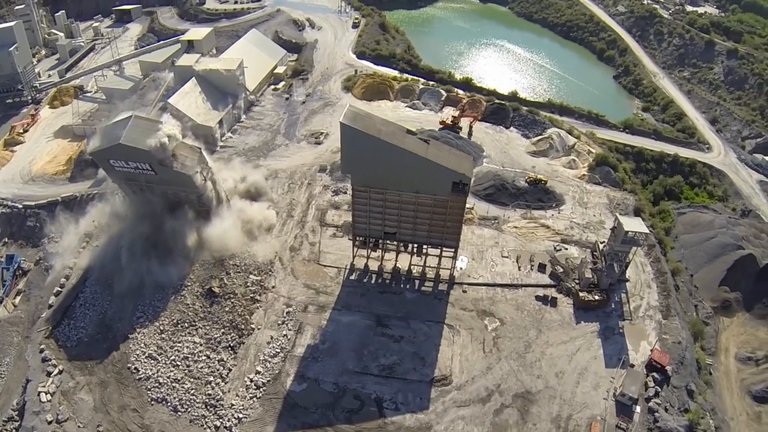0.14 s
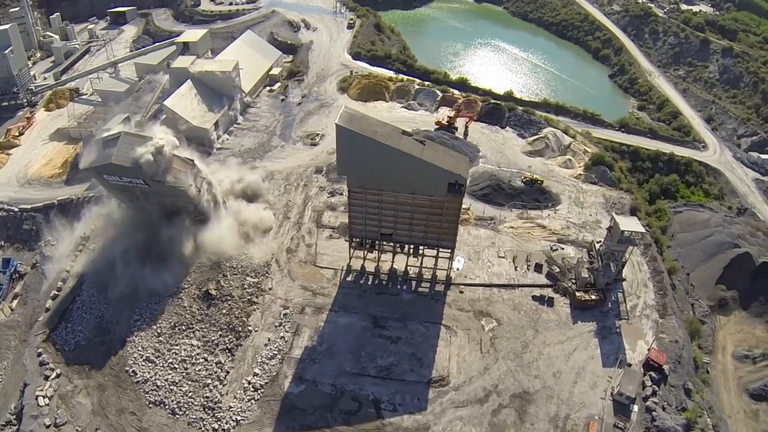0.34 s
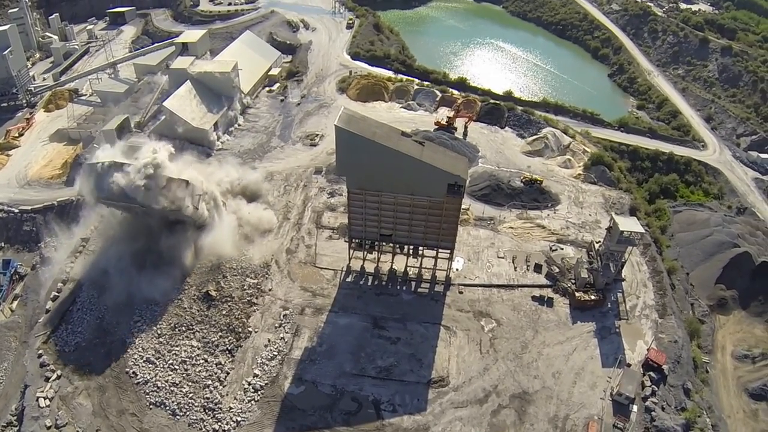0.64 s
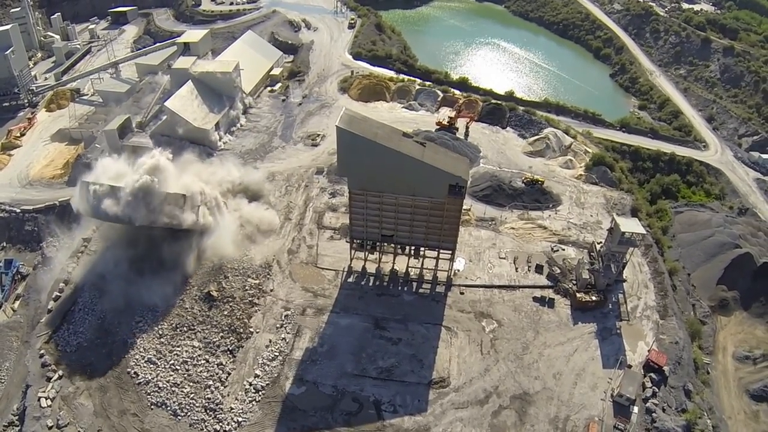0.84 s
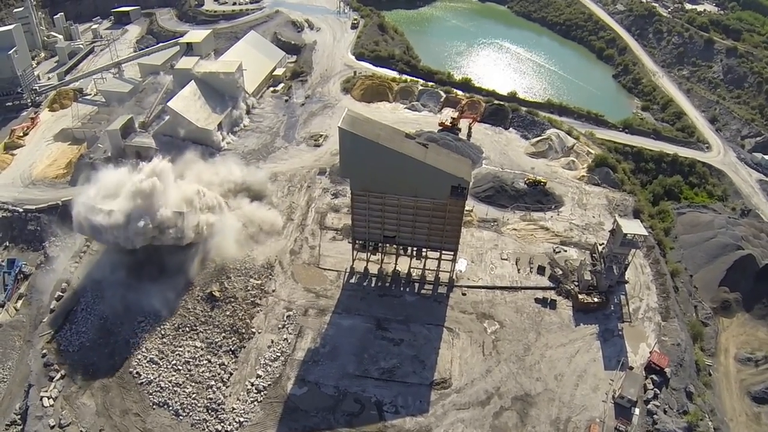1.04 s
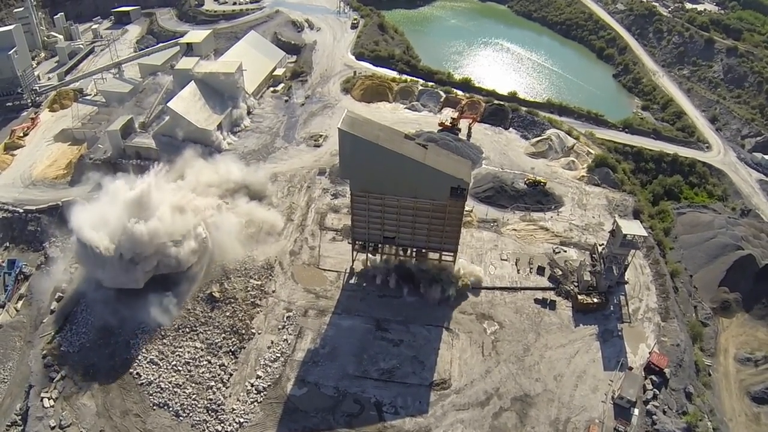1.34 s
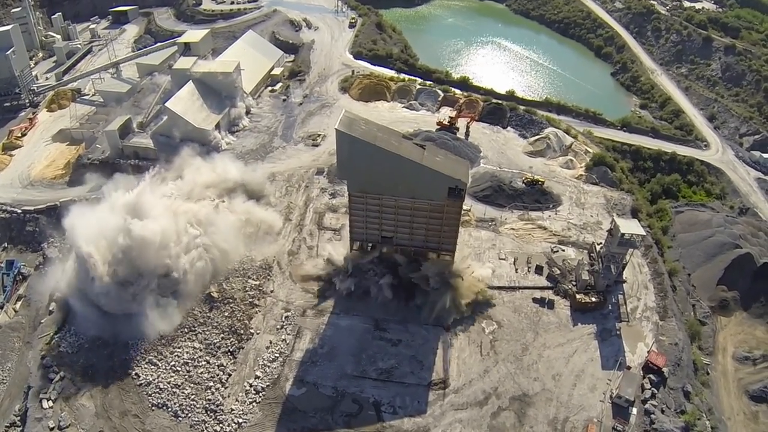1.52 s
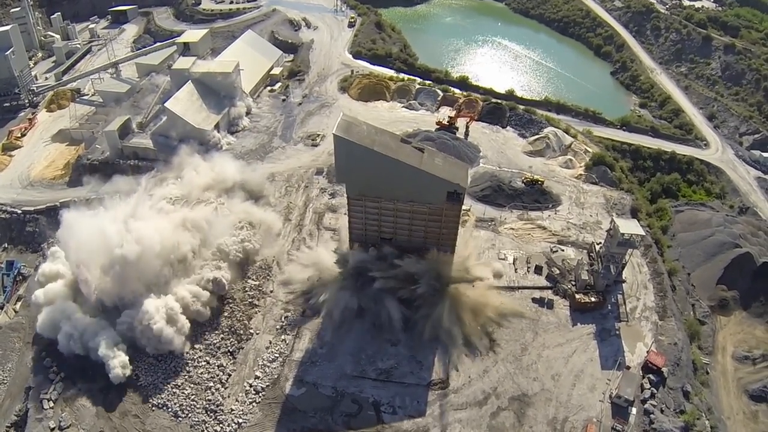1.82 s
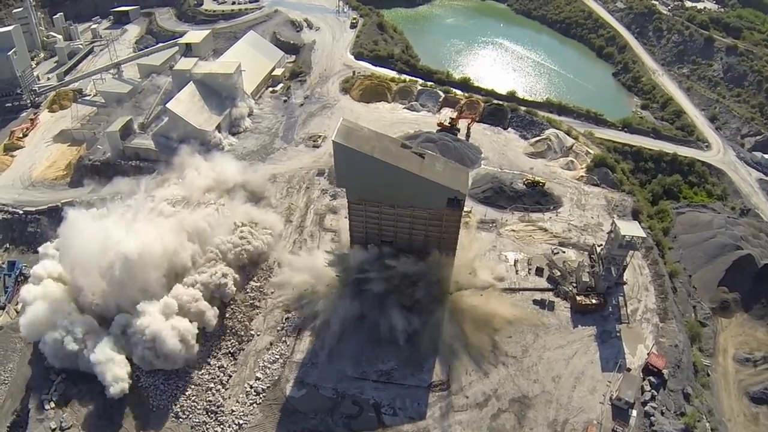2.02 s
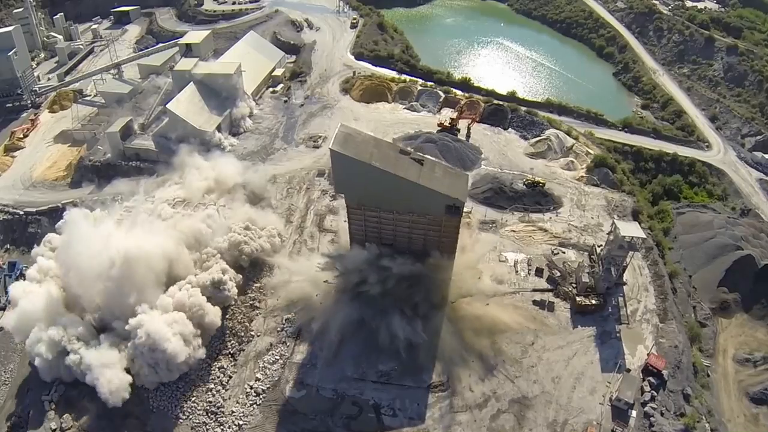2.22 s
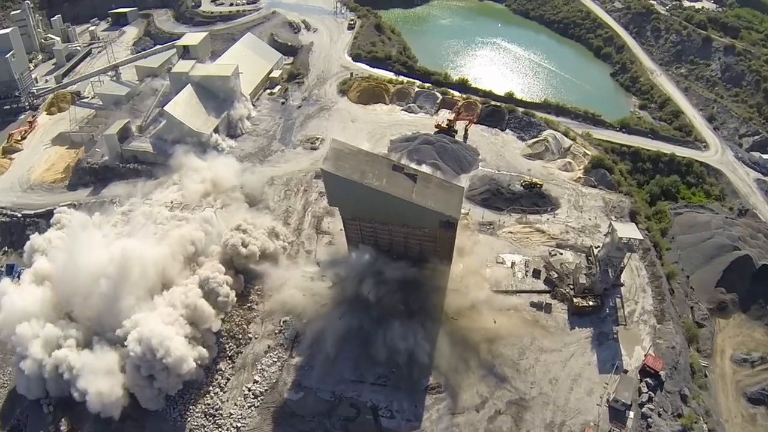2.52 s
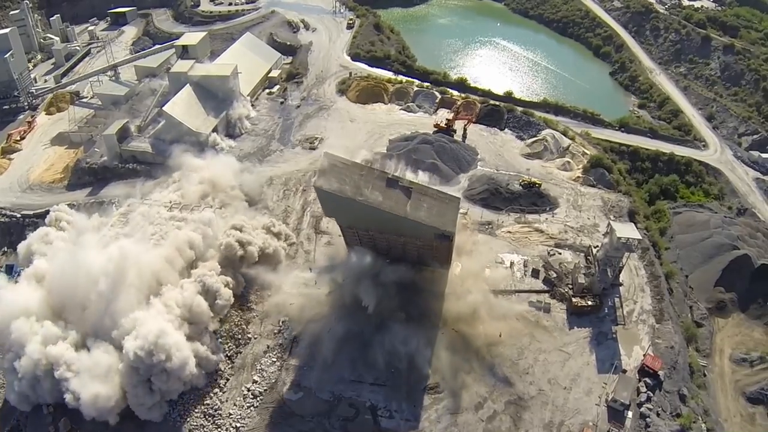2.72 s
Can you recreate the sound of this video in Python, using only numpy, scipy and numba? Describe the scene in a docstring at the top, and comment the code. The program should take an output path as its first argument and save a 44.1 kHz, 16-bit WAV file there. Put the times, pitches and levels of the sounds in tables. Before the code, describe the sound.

Explosive charge bangs at a tower base, overloading a wind-battered aerial microphone, then a low collapsing roar

```python
"""Wind and rotor downwash buffet a camera microphone hung under a rotor aircraft over a quarry.
Motors hiss and whine close by; gusts, eddies and ticks strike the microphone; falling buildings roar below.
At 1.52 s a demolition charge fires at the base of a tower: shock front, overpressure, crackle and low roll.
Sources are shaped noise, sines and pressure pulses. The blast pins the capsule against its stop;
the camera's gain control ducks at every overload and creeps back."""
import sys
import numpy as np
from scipy import signal
from scipy.fft import rfft, irfft, next_fast_len
from scipy.io import wavfile
from scipy.ndimage import minimum_filter1d, map_coordinates
from numba import njit

SR = 44100
rng = np.random.default_rng(int(sys.argv[2]) if len(sys.argv) > 2 else 0)


def waveform_to_disk(signal):
    """Save audio, clipped to [-1, 1], as 16-bit WAV at the path in sys.argv[1]."""
    frames = np.transpose(np.atleast_2d(signal))
    scaled = np.clip(frames, -1, 1) * 32767
    samples = np.round(scaled).astype(np.int16)
    wavfile.write(sys.argv[1], SR, samples)


N = 126126

# Every spectrum below lists freq_hz, density_db (per Hz, relative: the noise is scaled to rms 1).

# Low roll of the charge: time_s, level_db
ROLL_LEVEL = [(1.52, 1), (1.57, 12.5), (1.65, 11), (1.72, 9), (1.78, 5), (1.84, 2), (1.88, 1)]
# Tone of that roll: freq_hz, density_db
ROLL_SPECTRUM = [(20, -8.5), (60, -1), (100, -1), (165, 1), (300, -8.5), (500, -12.5), (1000, -26),
                 (4000, -33.5), (8000, -41), (14000, -49)]
# Bright tearing echoes of the charge: freq_hz, density_db
CRACKLE_SPECTRUM = [(100, -16), (400, 4.5), (1500, -10.5), (5000, -15.5), (12000, -18.5), (16000, -16)]
# Low surges of air after the blast: peak_s, pressure (signed, full scale 1), rise_s, fall_s
SURGES = [(1.878, -3.2, .002, .05), (1.899, 3.4, .006, .04), (1.92, 1.3, .012, .015),
          (1.96, -2.4, .015, .01), (2.135, -1, .004, .004), (2.215, -.8, .008, .008),
          (2.436, 1.1, .01, .006), (2.446, -.8, .003, .01)]
# Wind at the microphone, ahead of the gain control: time_s, rumble_db, downwash_db
WIND_LEVELS = [(0, -17.5, -18.5), (.15, -12.5, -18), (.22, -10, -14), (.3, -8.5, -11.5), (.5, -7, -9.5),
               (.65, -6, -6.5), (.76, -7.5, -6), (.83, -6, -11.5), (1.1, -7.5, -10.5), (1.22, -8.5, -10.5),
               (1.3, -5.5, -6), (1.37, -11, -6), (1.42, -7, -17), (1.45, -11.5, -21), (1.7, -11, -41),
               (1.95, -7, -50), (2.1, -7, -50), (2.24, -11.5, -39), (2.33, -4.5, -56), (2.44, -11, -47),
               (2.6, -10.5, -53), (2.86, -8, -48)]
# Tone of the wind rumble: freq_hz, density_db
RUMBLE_SPECTRUM = [(10, -25), (20, -6), (50, -5), (100, -14), (170, -17), (300, -24.5), (600, -36.5),
                   (1500, -58)]
# Blade passing rate: time_s, rate_hz
BLADE_RATE = [(0, 60.3), (.35, 59.8), (.55, 60.8), (.62, 58.7), (.9, 58.9), (1.1, 59.6), (1.18, 56.5),
              (1.27, 59.2), (2.86, 59)]
# Tone of the eddies shed once a blade, also roughens the gusts: freq_hz, density_db
SWIRL_SPECTRUM = [(80, -9), (200, -7), (350, -4.5), (650, -7.5), (1400, -13.5), (2400, -28), (5000, -62),
                  (9000, -80)]
# Single strong gusts: peak_s, pressure (signed; scales both tip and body)
GUST_HITS = [(0.0666, -1.21), (0.536, -2.86), (.779, -1.3), (1.0, -0.5), (1.4211, 3), (1.9024, 4),
             (2.251, 1.5), (2.452, -2), (2.6423, -0.7)]
# Strong eddies that rattle on the microphone: peak_s, level_db
EDDY_HITS = [(.157, -16.5), (0.19, -15.5), (0.305, -13.5), (0.375, -14), (.406, -7), (.439, -11.5),
             (0.458, -7), (.474, -10), (0.508, -16), (.525, -15), (0.572, -9.5), (.589, -11), (0.605, -6.5),
             (.622, -12.5), (0.671, -8), (0.691, -12), (0.725, -6.5), (0.767, -8.5), (0.807, -22),
             (0.842, -15.5), (0.894, -8.5), (.94, -13), (.981, -10), (0.998, -10), (1.042, -10),
             (1.132, -9), (1.148, -8.5), (1.204, -21), (1.242, -14.5), (1.289, -9), (1.354, -11),
             (2.137, -15.5), (2.349, -22), (2.4, -16), (2.45, -8.5), (2.662, -10), (2.769, -14)]
# Tone of those eddies, before they are squashed: freq_hz, density_db
EDDY_SPECTRUM = [(150, -9), (400, 6.5), (800, -2), (1500, -6), (2500, -24), (4500, -46.5), (9000, -75)]
# Motor hiss: time_s, level_db
HISS_LEVEL = [(0, -34), (.15, -27), (.3, -27.5), (.5, -28), (1.4, -30), (1.9, -34), (2.2, -29),
              (2.86, -29.5)]
# Tone of the motor hiss: freq_hz, density_db
HISS_SPECTRUM = [(500, -1), (1500, -10.5), (3000, -9), (5500, -7.5), (7800, -8.5), (10000, -5.5),
                 (13100, 3), (15500, -4)]
# Motor whine: time_s, pitch_hz
WHINE_PITCH = [(0, 14920), (.2, 14855), (.45, 14900), (.75, 14880), (1.1, 14925), (1.5, 14915),
               (2.2, 14950), (2.86, 14910)]
# Collapsing masonry: time_s, level_db
COLLAPSE_LEVEL = [(0, -28), (.12, -28.5), (.25, -26), (.7, -27), (1.4, -25), (1.7, -5), (1.85, -17),
                  (1.93, -12.5), (2.05, -21), (2.3, -18.5), (2.45, -16), (2.55, -18), (2.86, -19)]
# Tone of the masonry: freq_hz, density_db
MASONRY_SPECTRUM = [(40, -32), (100, -3.5), (250, -7.5), (500, -12.5), (800, -13), (1700, -23.5),
                    (4000, -29), (8000, -36), (15000, -82)]
# Small dry ticks: start_s, level_db (peak ahead of the band filter)
TICK_HITS = [(.724, -6), (1.0632, -4.5), (1.1074, -1), (1.1535, -5.5), (2.661, -13)]

# Blast: the front first throws the capsule backwards, with a brief rebound (times after BLAST_S)
BLAST_S = 1.5234
KICK_S, REBOUND_START_S, REBOUND_S = 0.00046, .00012, .00008
FRONT, FRONT_DECAY_S = 9, .0016  # pressure, full scale 1
OVERPRESSURE, OVERPRESSURE_DECAY_S = 2.9, 0.046
CRACKLE_DB, CRACKLE_S = 7.5, 0.17
ROLL_S, ROLL_LUMPS_DB = 0.342, 1.5
FADE_S = 0.0087  # softness of the end of crackle and roll

# Wind and rotor
RUMBLE_LUMPS_DB = 2
BLADE_START_CYCLES, BLADE_WANDER_HZ = -.2, .3
SECOND_HARMONIC_DB = -10  # relative to the thump's fundamental
SWIRL_DB, SWIRL_SHARPNESS, SWIRL_LATE_CYCLES, SWIRL_SCATTER_DB = -10.5, 0.82, 0.1754, 3.5
GUST_RISE_S, GUST_FALL_S, GUST_TIP_S = 0.0049, 0.0018, 0.00094
GUST_BODY, GUST_ROUGHNESS = 0.58, 0.047  # shares of the gust pressure
EDDY_RISE_S, EDDY_FALL_S = .0018, .0042

# Motors and ticks
HISS_FLUTTER = 0.33  # share pulsing twice a blade
WHINE_DB = -42
TICK_LOW_HZ, TICK_HIGH_HZ, TICK_T60_S = 1200, 6400, 0.0035

# Microphone and camera
STOP_IN, STOP_OUT, STOP_HARDNESS = 2, 4.2, 4.2  # capsule travel each way, full scale 1; exponent
COUPLING_HZ, TOP_HZ = 6.8, 15350  # input capacitor; band limit
BACK_OFF, ATTACK_S, RELEASE_S = 0.74, 0.00076, 0.279  # peak level aimed for after an overload


def amp(db):
    """Decibels to linear amplitude."""
    return 10 ** (np.asarray(db) / 20)


def unit(x):
    """x scaled to rms 1."""
    return x / np.sqrt(np.mean(x ** 2) + 1e-20)


def curves(rows):
    """One value per sample for each column after the time."""
    time_s, *columns = np.transpose(rows)
    return [np.interp(np.arange(N) / SR, time_s, column) for column in columns]


def wobble(rate):
    """A smooth random curve, rate knots a second."""
    knots = rng.standard_normal(int(N * rate / SR) + 4)
    return map_coordinates(knots, [np.arange(N) * rate / SR])


def filtered(x, response):
    """x times a response of frequency, zero-padded against wrap-around."""
    size = next_fast_len(N + SR // 2)
    hz = np.fft.rfftfreq(size, 1 / SR)
    return irfft(rfft(x, size) * response(hz), size)[:N]


def noise(spectrum):
    """Coloured noise of rms 1, empty up to 5 Hz."""
    freq_hz, density_db = np.transpose(spectrum)

    def response(hz):
        return amp(np.interp(np.log(hz + 1), np.log(freq_hz + 1), density_db)) * (hz > 5)

    return unit(filtered(rng.standard_normal(N), response))


def push(peak_s, rise_s, fall_s):
    """A pressure peak: exponential rise and fall."""
    t = np.arange(N) / SR - peak_s
    return np.exp(-np.abs(t) / np.where(t < 0, rise_s, fall_s))


def blast():
    """Shock front and later surges; apart from them overpressure, tearing crackle and a low roll."""
    t = np.arange(N) / SR - BLAST_S
    started = t >= 0
    rebound = (t >= REBOUND_START_S) & (t < REBOUND_START_S + REBOUND_S)
    backwards = started & (t < KICK_S) & ~rebound
    spike = started * np.exp(-np.abs(t - KICK_S) / FRONT_DECAY_S)
    front = FRONT * np.where(backwards, -1, spike)
    surges = sum(size * push(s, rise_s, fall_s) for s, size, rise_s, fall_s in SURGES)

    def fade(end_s):
        return started / (1 + np.exp(np.clip((t - end_s) / FADE_S, -50, 50)))

    overpressure = OVERPRESSURE * started * np.exp(-np.abs(t) / OVERPRESSURE_DECAY_S)
    tearing = unit(amp(0.67 * wobble(200)) * noise(CRACKLE_SPECTRUM))
    crackle = amp(CRACKLE_DB) * fade(CRACKLE_S) * tearing
    roll_db, = curves(ROLL_LEVEL)
    roll = amp(roll_db + ROLL_LUMPS_DB * wobble(24.83)) * fade(ROLL_S) * noise(ROLL_SPECTRUM)
    return front + surges, overpressure + crackle + roll


def downwash(turn):
    """Each passing blade thumps the air at two harmonics and sheds a burst of swirling noise."""
    second = amp(SECOND_HARMONIC_DB + 2.77 * wobble(15.4)) * np.cos(2 * turn - 1)
    thump = amp(2.0 + 1.75 * wobble(19)) * (np.cos(turn) + second)
    gate = np.exp(SWIRL_SHARPNESS * np.cos(turn - 2 * np.pi * SWIRL_LATE_CYCLES))
    gate = gate * amp(SWIRL_SCATTER_DB * np.tanh(wobble(50)))
    return thump + amp(SWIRL_DB) * unit(gate * noise(SWIRL_SPECTRUM))


def gusts():
    """Single pressure hits: a sharp tip over a slower, slightly rough body."""
    body = sum(size * push(s, GUST_RISE_S, GUST_FALL_S) for s, size in GUST_HITS)
    tips = sum(size * push(s, GUST_TIP_S, GUST_TIP_S) for s, size in GUST_HITS)
    return body * (GUST_BODY + GUST_ROUGHNESS * noise(SWIRL_SPECTRUM)) + tips


def eddies():
    """Short bursts of squashed noise rattling on the microphone."""
    bursts = sum(amp(db) * push(s, EDDY_RISE_S, EDDY_FALL_S) for s, db in EDDY_HITS)
    return bursts * unit(np.tanh(noise(EDDY_SPECTRUM)))


def wind():
    """Lumpy turbulent rumble, downwash, gusts and eddies; also returns the blade phase."""
    rumble_db, downwash_db = curves(WIND_LEVELS)
    lumps_db = RUMBLE_LUMPS_DB * np.tanh(wobble(18))
    rumble = amp(rumble_db + lumps_db) * unit(np.tanh(noise(RUMBLE_SPECTRUM) / 2))
    blade_hz, = curves(BLADE_RATE)
    cycles = np.cumsum(blade_hz + BLADE_WANDER_HZ * wobble(7.53)) / SR
    turn = 2 * np.pi * (BLADE_START_CYCLES + cycles)
    return rumble + amp(downwash_db) * downwash(turn) + gusts() + eddies(), turn


def motors(turn):
    """Noise hiss that flutters with the blades, and a thin high sine whine of unsteady pitch."""
    hiss_db, = curves(HISS_LEVEL)
    hiss = amp(hiss_db + 0.15 * wobble(3.0) + 0.36 * wobble(39.7)) * noise(HISS_SPECTRUM)
    hiss = hiss * (1 + HISS_FLUTTER * np.cos(2 * turn))
    whine_hz, = curves(WHINE_PITCH)
    phase = 2 * np.pi * np.cumsum(whine_hz + 6 * wobble(40)) / SR
    return hiss + amp(WHINE_DB + 2.0 * wobble(29.93)) * np.sin(phase)


def ticks():
    """Short bright ticks: random signs under exponential decays, band-passed."""
    t = np.arange(N) / SR
    bursts = sum(amp(db - 60 * np.abs(t - s) / TICK_T60_S) * (t >= s) for s, db in TICK_HITS)
    band = signal.butter(4, (TICK_LOW_HZ, TICK_HIGH_HZ), "bandpass", fs=SR, output="sos")
    return signal.sosfilt(band, bursts * np.sign(rng.standard_normal(N)))


def collapse():
    """Falling masonry below: a roar of noise, made grainy by slow and fast level wobbles."""
    level_db, = curves(COLLAPSE_LEVEL)
    grain = amp(1.03 * wobble(24.63) + 0.99 * wobble(150))
    return amp(level_db) * unit(grain * noise(MASONRY_SPECTRUM))


def scene():
    """The capsule flattens the blast's tail at its stops; shock front and surges get past them."""
    air, turn = wind()
    front, tail = blast()
    stop = np.where(tail > 0, STOP_IN, STOP_OUT)
    # near a stop the capsule has little freedom left, so wind and masonry are choked too
    freedom = 1 / (1 + np.abs(tail / stop) ** STOP_HARDNESS) ** (1 / STOP_HARDNESS)
    return (front + freedom * (tail + air + collapse()) + motors(turn) + ticks())[None]


@njit
def gain_control(x, pinned, back_off, attack, release):
    """Overload sets a lower goal at once; the goal recovers slowly unless the capsule is pinned."""
    gain, goal, out = 1.0, 1.0, np.empty_like(x)
    for i in range(len(x)):
        if abs(x[i]) * gain > 1:
            goal = min(goal, back_off / abs(x[i]))
        elif not pinned[i]:
            goal += (1 - goal) * release
        gain += (goal - gain) * attack
        out[i] = x[i] * gain
    return out


def record(dry):
    """Input capacitor, gain control, clipping, band limit."""
    x = signal.lfilter(*signal.butter(1, COUPLING_HZ, "highpass", fs=SR), dry[0])
    nearby_peak = -minimum_filter1d(-dry[0], size=401)  # highest pressure within 200 samples
    pinned = nearby_peak > .85 * STOP_IN
    x = gain_control(x, pinned, BACK_OFF, 1 / (ATTACK_S * SR), 1 / (RELEASE_S * SR))
    limited = filtered(np.clip(x, -1, 1), lambda hz: hz < TOP_HZ)
    return np.clip(limited, -1, 1)[None]


dry = scene()
out = record(dry)
waveform_to_disk(out)
```